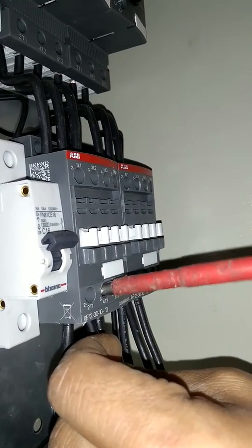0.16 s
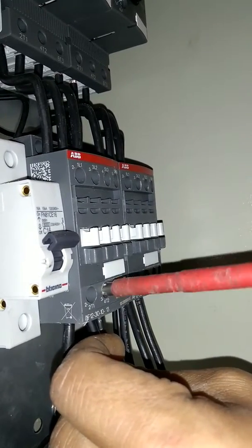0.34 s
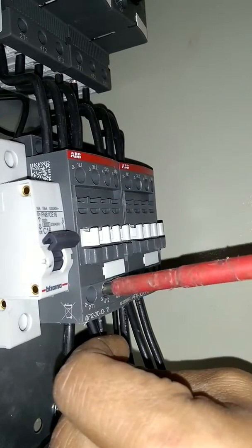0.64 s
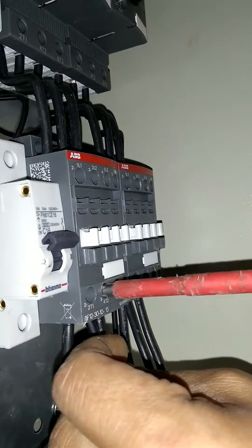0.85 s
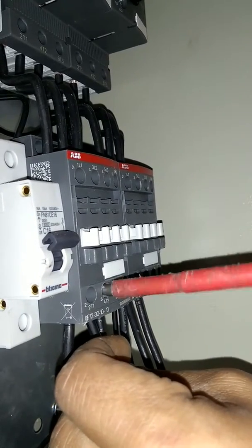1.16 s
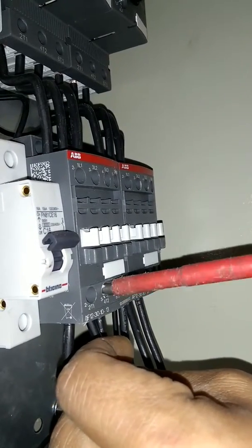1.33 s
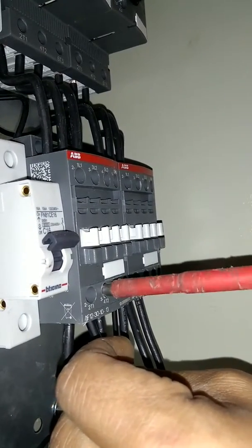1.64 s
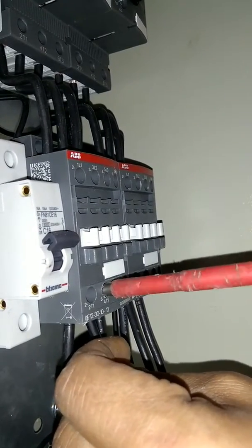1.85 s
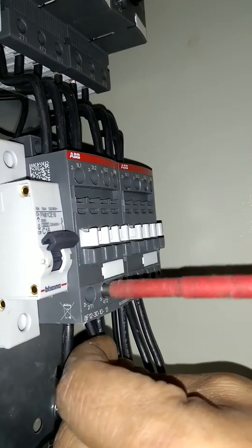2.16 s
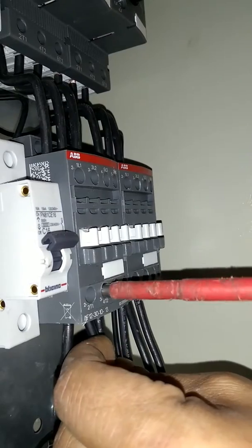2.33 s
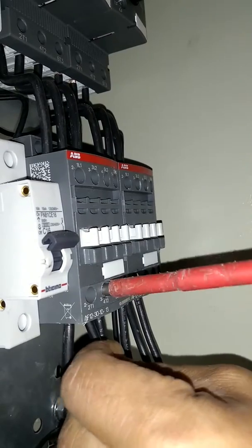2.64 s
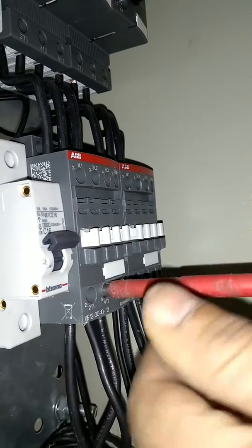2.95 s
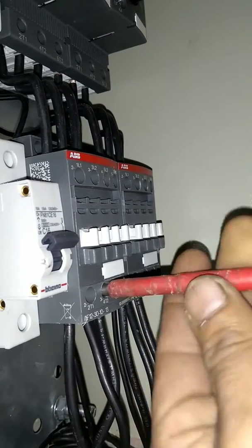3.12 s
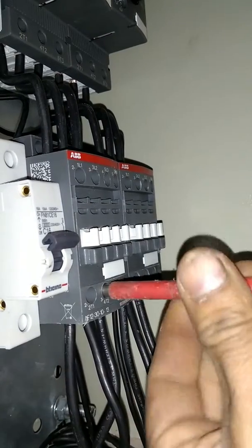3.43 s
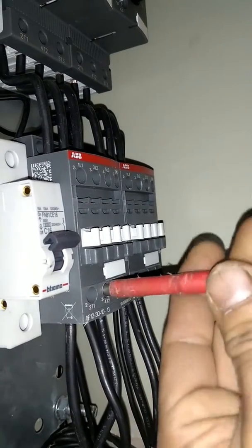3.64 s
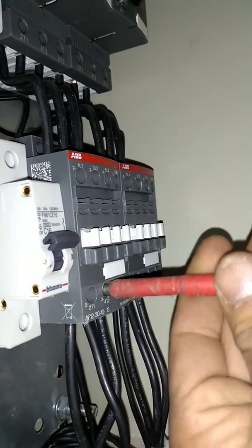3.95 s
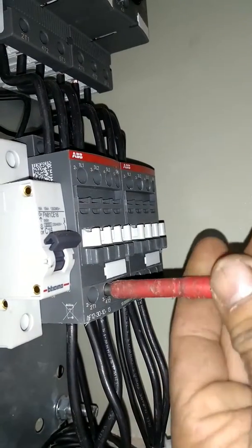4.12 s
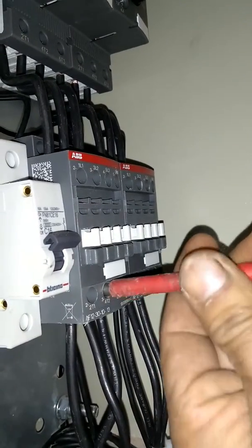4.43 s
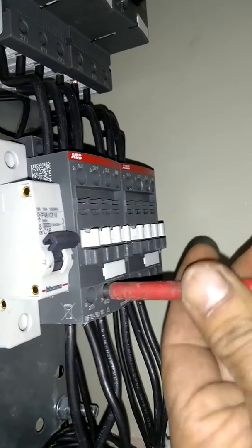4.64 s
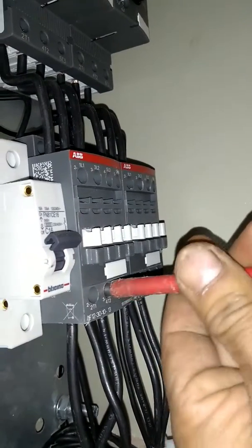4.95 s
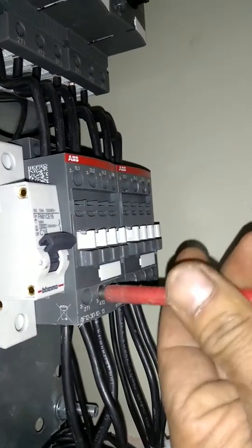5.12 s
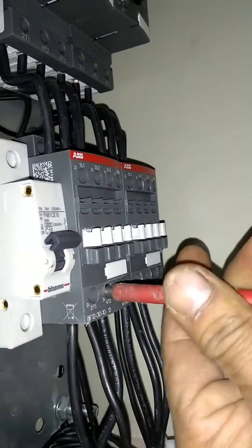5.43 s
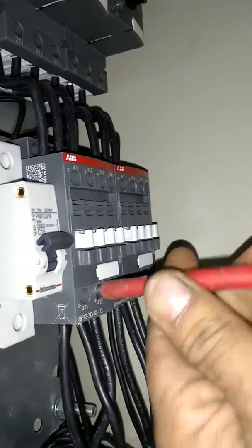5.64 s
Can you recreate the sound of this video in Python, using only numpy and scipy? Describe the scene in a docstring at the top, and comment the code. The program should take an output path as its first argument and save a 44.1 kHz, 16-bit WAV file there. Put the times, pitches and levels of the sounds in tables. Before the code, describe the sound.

Wires are shoved dully into an electrical contactor, then bright metallic clicks, hissing scrapes and hollow housing knocks follow irregularly in a bare room.

```python
"""In a small hard-walled room, close to the microphone, wires are shoved home into a contactor with a dull rumble.
Fingers and wires bump the back panel; soon firmer slips knock the plastic housing on its rail and make it boom.
A screwdriver scrapes in hissing strokes as fingers rub along its shaft, and its blade snaps in the screw head.
Halfway through, the hand slides off the wires with a rustle; snaps and knocks go on over a faint rumble.
Hits are random bursts ringing through resonances, with echoes; the handling is coloured noise shaped in strokes."""
import sys
import numpy as np
from scipy import signal
from scipy.fft import rfft, irfft
from scipy.io import wavfile
from scipy.ndimage import uniform_filter1d

SR = 44100
rng = np.random.default_rng(int(sys.argv[2]) if len(sys.argv) > 2 else 0)


def materialize(psi):
    """Save the field psi as 16-bit PCM at rate SR to the path in sys.argv[1].

    A 1-D psi becomes a single channel; in a 2-D psi each row is a channel.
    """
    bounded = np.clip(np.atleast_2d(psi).T, -1, 1)
    quanta = np.round(bounded * 32767).astype(np.int16)
    wavfile.write(sys.argv[1], SR, quanta)


N = 254898  # length [samples]


def gain_of(db):
    """Decibels to an amplitude factor."""
    return 10 ** (np.asarray(db) / 20)


def evened(x):
    """Scaled to rms 1."""
    return x / np.sqrt(np.mean(x ** 2) + 1e-20)


def unit(x):
    """Scaled to a mean energy of 1 per channel."""
    return evened(x) / np.sqrt(x.shape[-1])


def read(points, hz):
    """Reads a table on a log-frequency axis."""
    f, value = np.transpose(points)
    return np.interp(np.log(hz + 1), np.log(f + 1), value)


def add(mix, s, sound):
    """Mixes a stereo sound in at time s [s]."""
    part = mix[:, max(round(s * SR), 0):][:, :sound.shape[1]]
    part += sound[:, :part.shape[1]]


def convolve(a, b):
    """Convolution along time, channel by channel."""
    return signal.fftconvolve(np.atleast_2d(a), np.atleast_2d(b), axes=1)


# balance between the two microphone ports: (frequency [Hz], left minus right [dB])
PORT_BALANCE = [(100, -0.5), (330, -1), (770, 2), (1500, 4), (2740, 0), (4200, 0.5), (5500, 8.5),
                (6500, 16.5), (7400, 11), (8500, -3), (10000, -4), (15000, -6)]


def colour(spectrum, modes=(), size=4096):
    """Causal minimum-phase stereo filter: a spectrum and its resonances as the two microphone ports hear them."""
    hz = np.fft.rfftfreq(size, 1 / SR)
    power = np.ones(len(hz))
    for f, width, db in modes:
        excess = np.maximum(gain_of(db) ** 2 - 1, 0)  # a resonance below 0 dB adds nothing
        power += excess / (1 + (2 * (hz - f) / width) ** 2)
    port_db = read(spectrum, hz) + np.outer([.5, -.5], read(PORT_BALANCE, hz))
    log_gain = np.log(np.sqrt(power) * gain_of(port_db))
    circle = np.hstack([log_gain, log_gain[:, -2:0:-1]])
    response = np.fft.ifft(np.exp(np.conj(signal.hilbert(circle)))).real
    return unit(response[:, :size // 2])


# how alike the two ports hear a sound: (frequency [Hz], likeness [0 to 1])
PORT_LIKENESS = [(50, 1), (250, 0.95), (500, 0.88), (1000, 0.26), (16000, 0)]


def paired(x):
    """Two unrelated signals become alike in the bass."""
    left, other = rfft(x)
    same = read(PORT_LIKENESS, np.fft.rfftfreq(x.shape[1], 1 / SR))
    right = same * left + np.sqrt(1 - same ** 2) * other
    return irfft(np.array([left, right]), x.shape[1])


def smoothed(x, share=0.3):
    """Evens out the notches and peaks in the spectrum of a short burst; share 1 flattens them most."""
    z = rfft(x, 2 * x.shape[-1])
    flatter = z / (abs(z) + 1e-9) ** share
    return unit(irfft(flatter)[..., :x.shape[-1]])


def scatter(t60, share=0.93, size=2048):
    """Quick reflections between the parts in the panel, different for each port and fading over t60 [s]."""
    t = np.arange(size) / SR
    return smoothed(paired(rng.standard_normal((2, size))) * gain_of(-60 * t / t60), share)


def tilted(x, slope_db, centre_hz=7000):
    """Brightens or dulls a sound about a centre, by slope_db per octave."""
    ratio = np.fft.rfftfreq(x.shape[1], 1 / SR) / centre_hz
    octaves = np.log2(np.clip(ratio, 1 / 2, 10))
    return irfft(rfft(x) * gain_of(slope_db * octaves), x.shape[1])


def noise(spectrum):
    """Steady stereo noise of this colour, rms 1."""
    source = paired(rng.standard_normal((2, N + 2047)))
    return evened(signal.fftconvolve(source, colour(spectrum), "valid", axes=1))


def lumps(depth_db, size=900):
    """Unevenness: a gain that wanders within a few hundredths of a second."""
    wander = uniform_filter1d(uniform_filter1d(rng.standard_normal(N), size), size)
    return evened(gain_of(depth_db * np.clip(evened(wander), -2, 2)))


def strokes(rows, attack_s, sag_db, release_s):
    """Level of rubbing or pushing: each stroke rises, sags while it lasts and fades out."""
    t, level = np.arange(N) / SR, np.zeros(N)
    for start, end, db in rows:
        progress = np.clip((t - start) / (end - start), 0, 1)
        rise = np.clip((t - start) / attack_s, 0, 1)
        fade = np.clip((end - t) / release_s + .5, 0, 1)  # half gone at the end time
        level += gain_of(db - sag_db * progress) * rise * fade
    return level


# the still room: (frequency [Hz], relative level per Hz [dB])
STILL_ROOM = [(20, -28), (40, -12.5), (58, 6), (110, -1.5), (170, -5), (230, 2.5), (330, -5.5),
              (450, -16.5), (600, -8.5), (800, -20), (1500, -21), (3000, -30.5), (6500, -29), (15000, -47)]


def still_room(hum_db=-69):
    """Faint low rumble of the still room: coloured noise that wavers slightly."""
    return gain_of(hum_db) * noise(STILL_ROOM) * lumps(depth_db=1.0)


# wires shoved into the terminal, then settling: (start [s], end [s], relative level at the start [dB])
SHOVES = [(0.0, 0.4, -26), (0.36, 0.767, -47.5)]
# the panel flexing behind them: (frequency [Hz], half-width to -6 dB [Hz], relative level [dB])
PANEL = [(95, 21, -3), (165.6, 14, 2), (214.3, 19.4, -1.5), (264, 22, -1.5), (291, 12.7, -6),
         (419, 82, -20), (602.4, 17.5, -12.5)]
# insulation rubbing as the wires slide in: (frequency [Hz], relative level per Hz [dB])
INSULATION = [(200, -8), (500, -3.5), (800, -3.5), (1200, -12.5), (2000, -21.5), (3200, -28), (6000, -36.5),
              (12000, -43)]


def shove(judder_db=-1, rub_db=-24):
    """Stiff wires judder through the hand and drum on the back panel while their insulation rubs."""
    hz = np.fft.rfftfreq(N, 1 / SR)
    flexing = sum(gain_of(db) / (1 + 1j * (hz - f) / width) ** 2 for f, width, db in PANEL)
    judder = evened(irfft(rfft(paired(rng.standard_normal((2, N)))) * flexing, N))
    effort = strokes(SHOVES, attack_s=0.081, sag_db=12.5, release_s=0.087)
    return effort * (gain_of(judder_db) * judder + gain_of(rub_db) * noise(INSULATION))


# back panel: (frequency [Hz], relative level per Hz [dB])
BACK_PANEL = [(25, -44), (50, -16.5), (85, -2.5), (120, -4.5), (160, -3), (230, -2.5), (400, -16.5),
              (1000, -53.5)]


def boom(length, size=6144):
    """A soft push on the back panel that swells and dies at a pace set by length [s], energy 1."""
    u = np.arange(size) / SR / length
    push = smoothed(paired(rng.standard_normal((2, size))) * u * np.exp(-2 * u), share=0.25)
    return unit(convolve(push, colour(BACK_PANEL)))


# fingers and wires bumping softly on the back panel: (time [s], relative level [dB])
BUMPS = [(0.042, -26.5), (0.083, -37), (0.171, -26), (0.403, -57), (0.474, -34.5), (0.538, -42),
         (0.652, -40.5), (1.645, -33.5), (2.841, -35), (2.954, -44), (2.999, -59), (3.606, -34),
         (4.04, -35), (5.019, -42), (5.395, -42), (5.699, -32), (5.735, -35)]


def bumps(bump_db=17):
    """Fingertips and wires nudge the back panel, each nudge a short boom."""
    out = np.zeros((2, N))
    for s, db in BUMPS:
        add(out, s, gain_of(db + bump_db) * boom(length=0.0072))
    return out


# housing knocked on its rail: (time [s], relative level [dB], rattle decay time [s])
KNOCKS = [(0.172, -37.5, 0.0089), (0.91, -42.5, 0.0086), (1.176, -49.5, .0061), (1.642, -45, .014),
          (2.342, -40, 0.0054), (2.371, -56, 0.012), (2.793, -36, 0.0064), (2.837, -65, .008),
          (2.925, -51.5, 0.0031), (3.608, -36.5, 0.0027), (4.027, -36, 0.012), (4.053, -31.5, 0.0086),
          (4.085, -32, 0.0099), (4.19, -68, 0.0017), (4.71, -48.5, 0.011), (4.753, -60, 0.0063),
          (4.831, -60.5, .01), (5.007, -46, 0.0077), (5.191, -59.5, .005), (5.346, -55, 0.029),
          (5.66, -28, 0.0045)]
# housing and rail: (frequency [Hz], relative level per Hz [dB])
THUD = [(50, -19), (120, -16), (220, -4), (370, -8), (500, -4), (650, -7.5), (900, -8.5), (1500, -19),
        (3000, -28.5), (6000, -54.5)]
# resonances of the plastic housing: (frequency [Hz], width [Hz], level over the spectrum [dB])
HOUSING = [(260, 90, 9.5), (368, 100, 13), (617, 36, 12.5), (756, 15, 14), (924, 32, 7), (1231, 75, 6),
           (2064, 210, 12), (2558, 240, 9)]


def knocks(thud_db=29, boom_db=5, bright_db=1.0, rise_s=0.0018, size=4096):
    """A firm slip jolts the whole housing, which rattles briefly on its rail and makes the back panel boom."""
    out, body, t = np.zeros((2, N)), colour(THUD, HOUSING), np.arange(size) / SR
    for s, db, length in KNOCKS:
        jolt = (1 - np.exp(-t / rise_s)) * np.exp(-t / length)
        rattle = smoothed(paired(rng.standard_normal((2, size))) * jolt, share=0.6)
        thud = unit(tilted(convolve(rattle, body), bright_db, centre_hz=400))
        add(out, s, gain_of(db + thud_db) * thud)
        add(out, s, gain_of(db + boom_db) * boom(length=0.016))
    return out


def creep(rise_s=0.0045, size=1024):
    """Just before it lets go, the blade creeps over the metal in a few growing ticks."""
    ticks = rng.standard_normal(size) ** 3  # cubing leaves a few ticks standing out
    before = (np.arange(size) - size) / SR
    return unit(ticks * np.exp(before / rise_s))


def chatter(length, spread_db=6, size=1536):
    """Metal catches and slips: a cluster of tiny impacts that swells and dies within milliseconds."""
    u = np.arange(size) / SR / length
    impacts = rng.standard_normal(size) * gain_of(spread_db * rng.standard_normal(size))
    return smoothed(impacts * u ** 1.4 * np.exp(-1.6 * u ** 2), share=0.58)


# dense short ring of the clamp: (frequency [Hz], relative level per Hz [dB])
CLAMP = [(2500, -51.5), (3800, -16), (5000, -10.5), (6000, -1.5), (6800, -2.5), (8000, 1), (9500, -9),
         (11000, -14), (13500, -26), (15500, -25.5), (16000, -27.5)]
# resonances of blade and screw: (frequency [Hz], width [Hz], level over the clamp's ring [dB])
STEEL = [(4010, 63, 8), (4650, 310, 6.5), (5360, 200, 4.5), (6540, 45, 6), (6832, 230, 9), (7420, 57, -4.5),
         (7500, 250, 5.5), (7630, 110, 1.5), (8960, 160, 6.5), (9400, 57, 4), (10300, 120, 5),
         (9570, 170, 4), (10600, 120, 6)]


def steel():
    """Ring of blade and screw: a few clear resonances over the dense ring of the clamp."""
    return convolve(scatter(t60=0.017, share=1.0), colour(CLAMP, STEEL))


# blade or wire end striking the plastic shell itself: (time [s], relative level [dB], chatter length [s])
CLACKS = [(0.172, -45.5, 0.0032), (0.8836, -43, 0.043), (2.323, -46.5, 0.0077), (2.3401, -40, 0.0017),
          (2.792, -40, 0.0041), (4.05, -31.5, 0.003), (5.3288, -47.5, 0.014), (5.6598, -24, 0.0037),
          (5.718, -42, 0.0051)]
# blade snapping in the screw head: (time [s], relative level [dB], chatter length [s])
SNAPS = [(0.4054, -33.5, 0.0056), (0.4505, -28.5, 0.0024), (0.941, -5.5, 0.0045), (1.1085, -13.5, 0.005),
         (1.1735, -6, 0.0036), (1.345, -21.5, .005), (1.417, -22.5, 0.0048), (1.5907, -7.5, 0.0057),
         (1.6438, -4.5, 0.0053), (1.6852, -21, 0.0083), (1.789, -36.5, .0067), (2.0862, -14, 0.0037),
         (2.3453, -15, 0.007), (2.3776, -24.5, 0.0083), (2.8954, -18, 0.0041), (3.3231, -17, 0.0084),
         (3.364, -27, 0.013), (3.42, -23.5, 0.0052), (3.469, -16, 0.0053), (3.508, -36.5, 0.0093),
         (3.6095, -0.5, 0.0045), (3.85, -22.5, 0.0066), (3.9421, -3.5, 0.0035), (4.031, -14, .005),
         (4.0815, 3, 0.0041), (4.2763, -25, 0.0055), (4.302, -32.5, 0.0021), (4.333, -39, 0.0025),
         (4.7032, -11.5, 0.0081), (4.9639, -29, 0.0051), (5.02, -20.5, 0.006), (5.1017, -9, 0.0048),
         (5.1475, -15.5, 0.0043), (5.2536, -36.5, 0.0064), (5.429, -31, 0.0075), (5.607, -14, 0.0062)]
# plastic shell: (frequency [Hz], relative level per Hz [dB])
SHELL = [(300, -34), (600, -15.5), (780, -8), (1100, -3.5), (1600, -1.5), (2050, -4), (2600, -5.5),
         (3300, 0.5), (4200, 1), (6000, -11.5)]
# answers of shell to snap and of steel to clack, before the gains of the two layers
SHELL_DB, CLACK_STEEL_DB = -27.5, 8.5
# steel answers above NEUTRAL_DB are brighter and those below duller: dB per octave for each dB
NEUTRAL_DB, BRIGHTEN = -17.5, .17


def snaps(ring_db=18, clack_db=28, creep_db=-33, stray_db=-1):
    """Each snap rings the steel and, more weakly, the plastic shell; a clack rings shell and steel about equally."""
    out, metal, clamp, shell = np.zeros((2, N)), steel(), colour(CLAMP, STEEL), colour(SHELL, HOUSING)
    on_steel = [(s, db, db + SHELL_DB, length) for s, db, length in SNAPS]
    on_shell = [(s, db + CLACK_STEEL_DB, db, length) for s, db, length in CLACKS]
    for s, steel_db, shell_db, length in on_steel + on_shell:
        lead = gain_of(creep_db) * creep()
        force = np.hstack([lead, chatter(length)])
        start = s - len(lead) / SR
        # the blade sits a little differently every time, so part of the ring takes new paths
        stray = unit(convolve(scatter(t60=0.025), clamp))
        ring = convolve(force, unit(metal) + gain_of(stray_db) * stray)
        ring = unit(tilted(ring, BRIGHTEN * (steel_db - NEUTRAL_DB)))
        clack = unit(convolve(force, convolve(scatter(t60=0.038, share=0.44), shell)))
        add(out, start, gain_of(steel_db + ring_db) * ring)
        add(out, start, gain_of(shell_db + clack_db) * clack)
    return out


# bare walls: (frequency [Hz], time to fall 60 dB [s])
ROOM_DECAY = [(100, 0.68), (400, 0.3), (1500, 0.25), (4000, 0.21), (7000, 0.35), (10000, 0.54),
              (15000, 0.3)]
# how strongly the walls answer: (frequency [Hz], relative level [dB])
ROOM_SEND = [(100, -1.5), (500, -1), (1500, -6), (4000, -7.5), (7000, -16), (10000, -18.5), (15000, -14.5)]


def echoes(build_s=0.001):
    """Dense echoes of bare walls, each band dying at its own speed."""
    hz, t, z = signal.stft(paired(rng.standard_normal((2, SR // 2))), SR, nperseg=256)
    t60 = read(ROOM_DECAY, hz)[:, None]
    decay_db = read(ROOM_SEND, hz)[:, None] - 60 * t / t60
    z = z * gain_of(decay_db) * (1 - np.exp(-t / build_s))
    level = np.sqrt(2 * np.log(1000) / (t60 * SR))  # long and short decays carry like energy
    return signal.istft(z * level, SR, nperseg=256)[1]


def room(x, count=3, turn_hz=4):
    """The small room answers with several echo patterns that take turns at a fixed pace."""
    t, answer = np.arange(N) / SR, np.zeros((2, N))
    for k in range(count):
        share = np.sqrt(2 / count) * np.cos(np.pi * (turn_hz * t + k / count))
        answer += convolve(x * share, echoes())[:, :N]
    return answer


# rubbing of blade and skin: (frequency [Hz], relative level per Hz [dB])
RUB = [(300, -21.5), (1200, -6.5), (2200, -11.5), (3500, -14), (4800, -14), (5700, 2.5), (6700, -6.5),
       (8000, -2.5), (10000, -10.5), (13000, -10), (15500, -16)]


def friction(grain_db=8.0, grains_per_s=500):
    """Dragging over tiny ridges: grains in a fine hiss, coloured by the steel, rms 1."""
    sizes = gain_of(grain_db * np.minimum(rng.exponential(1, N), 4))
    grains = (rng.random(N) < grains_per_s / SR) * sizes
    drag = evened(convolve(grains, scatter(t60=0.06))[:, :N]) + rng.standard_normal((2, N))
    return evened(convolve(drag, colour(RUB, STEEL))[:, :N])


# strokes of blade and fingers scraping: (start [s], end [s], level at the start [dB])
SCRAPES = [(0.175, 0.39, -52.5), (0.392, 0.629, -58.5), (0.83, 0.938, -56.5), (1.069, 1.52, -53.5),
           (1.56, 1.904, -58), (2.024, 2.502, -58), (3.335, 3.927, -49), (4.03, 4.461, -52),
           (4.582, 4.911, -58), (4.963, 5.172, -55), (5.341, 5.533, -52)]


def scrapes():
    """Scraping hiss in strokes that start abruptly, weaken slowly and fade out."""
    return friction() * strokes(SCRAPES, attack_s=0.0073, sag_db=7.5, release_s=0.056)


# hand loosening its grip, then sliding off the wires: (start [s], end [s], relative level at the start [dB])
SLIDES = [(2.583, 2.79, -48), (2.795, 3.06, -49)]
# low rustle of the hand: (frequency [Hz], relative level per Hz [dB])
RUSTLE = [(20, -10.5), (40, -3.5), (60, 21), (110, 4), (200, 0), (330, -6), (600, -16), (900, -35),
          (1400, -40), (2500, -52), (4000, -43), (12000, -45)]


def hand(rustle_db=-5, hiss_db=-2):
    """The hand lets go of the wires and slides off them with a soft low rustle and a hiss of skin."""
    rustle = noise(RUSTLE) * strokes(SLIDES, attack_s=0.013, sag_db=5, release_s=0.044)
    hiss = friction() * strokes(SLIDES, attack_s=0.014, sag_db=16.5, release_s=0.026)
    return gain_of(rustle_db) * rustle + gain_of(hiss_db) * hiss


def scene():
    """Snaps and knocks in the room, over the sounds of the hand and a faint wavering rumble."""
    handling = shove() * lumps(depth_db=2, size=600) + bumps()
    handling += scrapes() * lumps(depth_db=4.5) + hand() * lumps(depth_db=0.5)
    hits = knocks() + snaps()
    return still_room() + handling + hits + room(hits)


def record(dry, bass_cut_hz=42, ceiling=.92, edge_hz=15950):
    """The close microphone sheds the deepest bass, peaks flatten near full scale, and the top treble is cut."""
    x = signal.sosfilt(signal.butter(2, bass_cut_hz, "highpass", fs=SR, output="sos"), dry)
    limited = x / (1 + (x / ceiling) ** 8) ** (1 / 8)
    lowpass = signal.firwin(301, edge_hz, window=("kaiser", 8), fs=SR)
    return signal.oaconvolve(limited, lowpass[None], "same", axes=1)


dry = scene()
out = record(dry)
materialize(out)
```